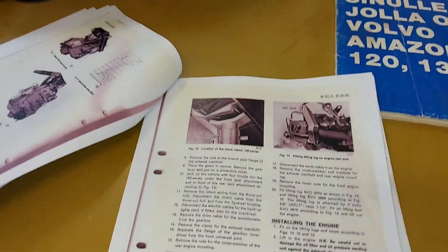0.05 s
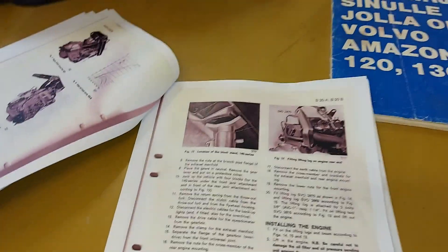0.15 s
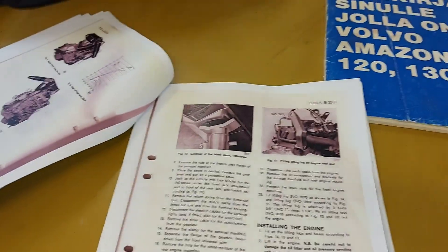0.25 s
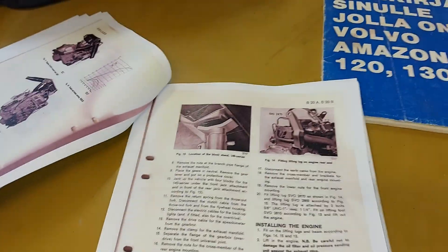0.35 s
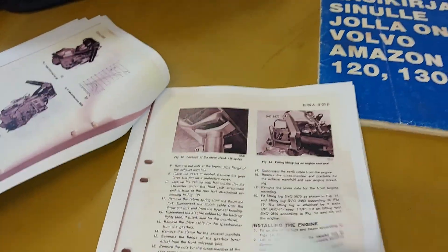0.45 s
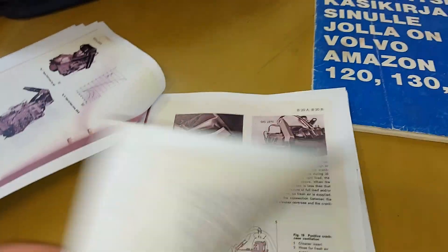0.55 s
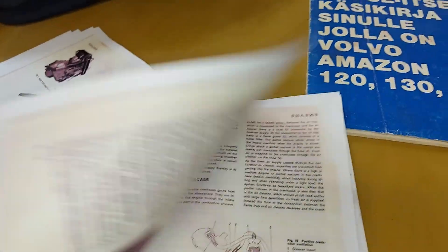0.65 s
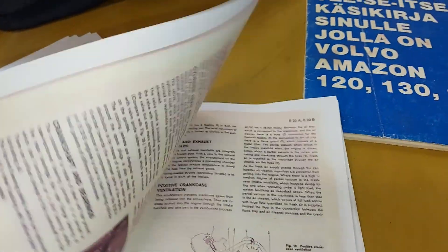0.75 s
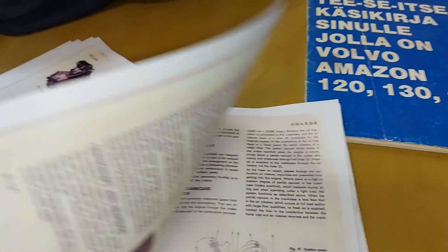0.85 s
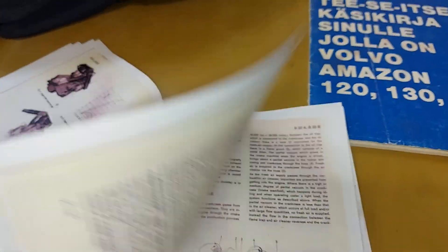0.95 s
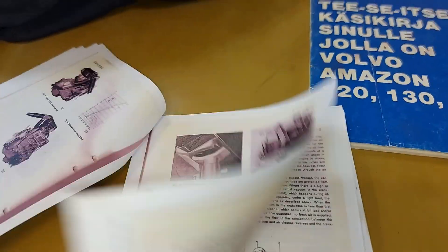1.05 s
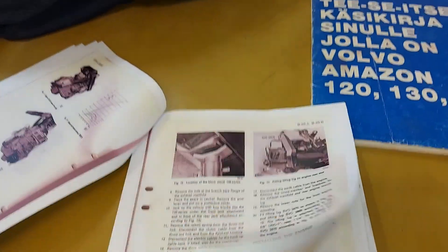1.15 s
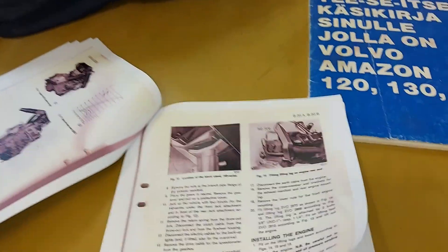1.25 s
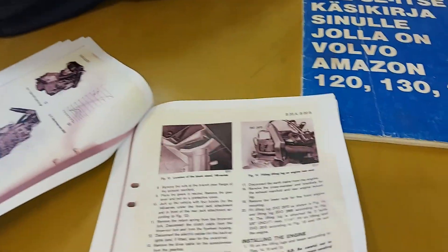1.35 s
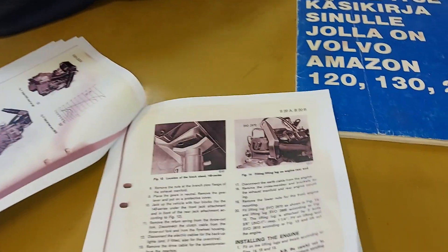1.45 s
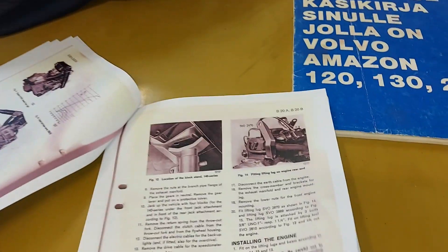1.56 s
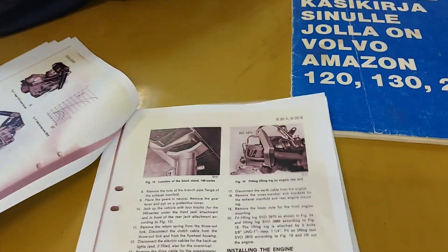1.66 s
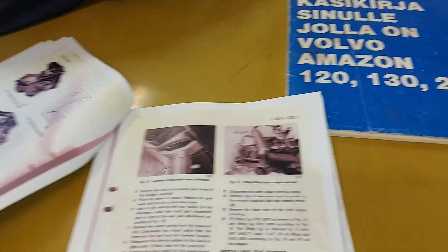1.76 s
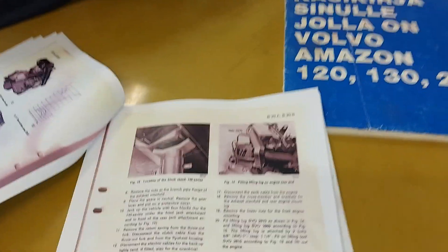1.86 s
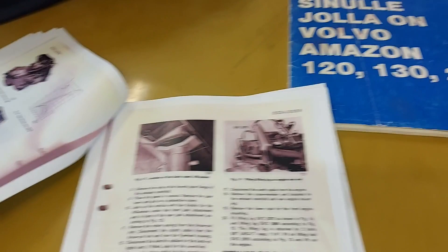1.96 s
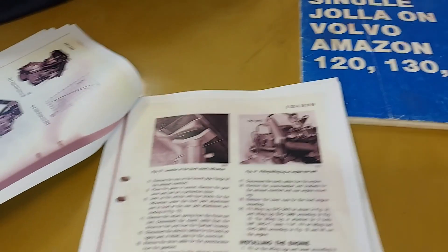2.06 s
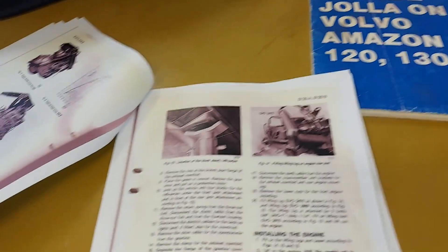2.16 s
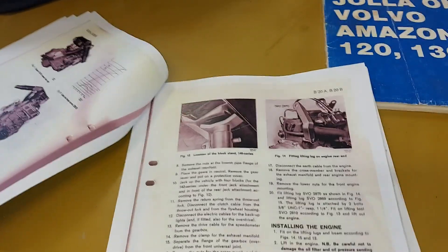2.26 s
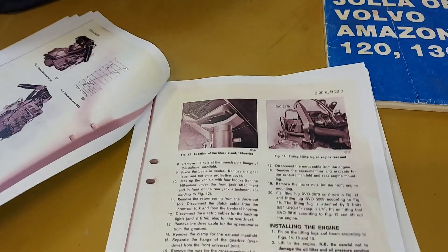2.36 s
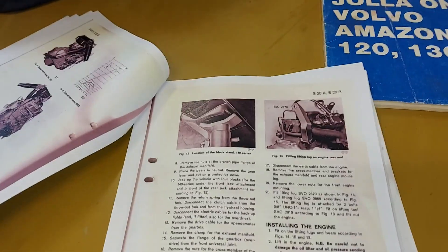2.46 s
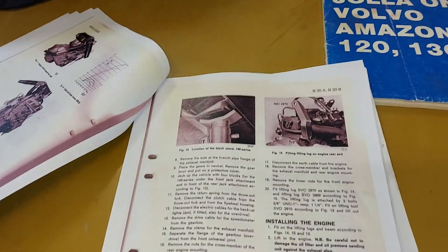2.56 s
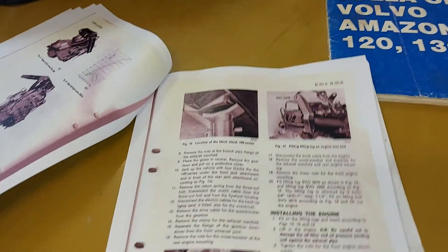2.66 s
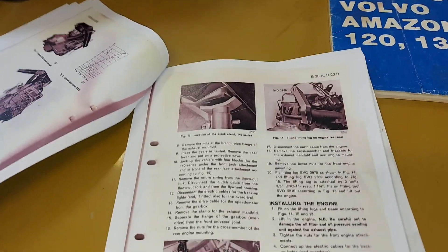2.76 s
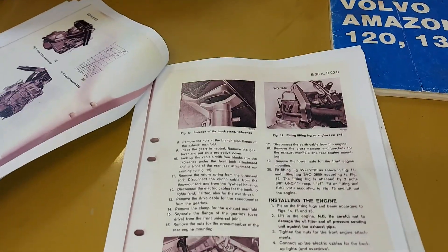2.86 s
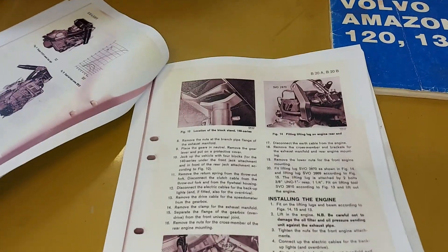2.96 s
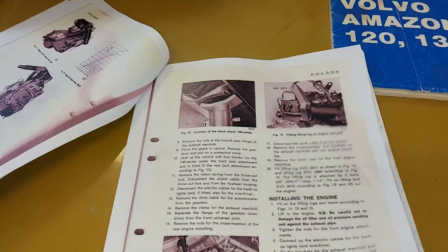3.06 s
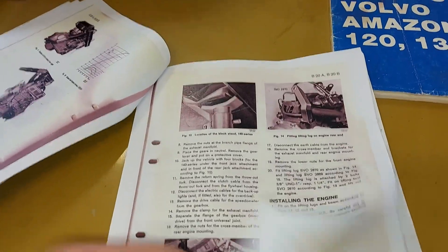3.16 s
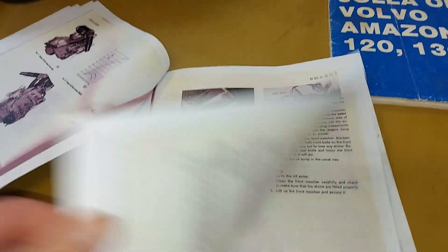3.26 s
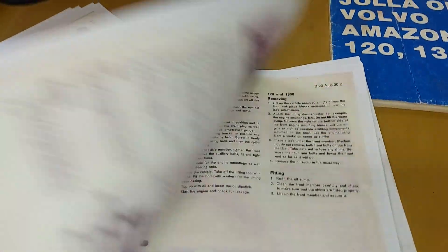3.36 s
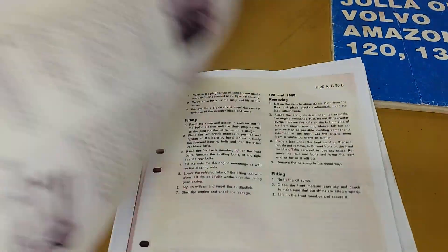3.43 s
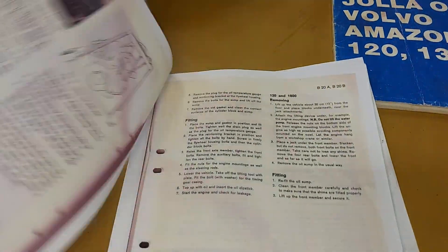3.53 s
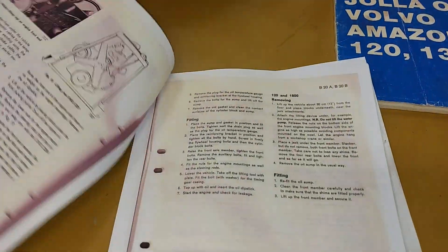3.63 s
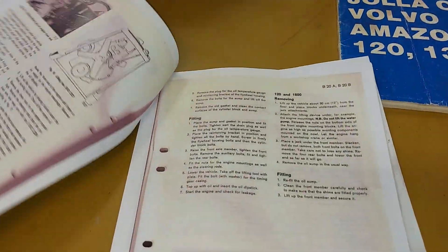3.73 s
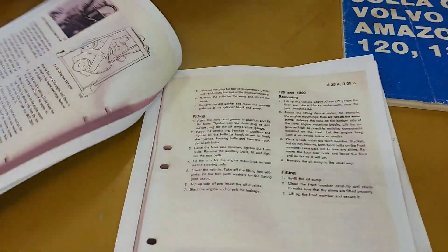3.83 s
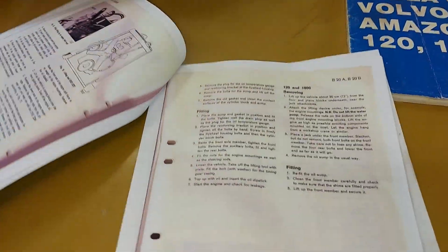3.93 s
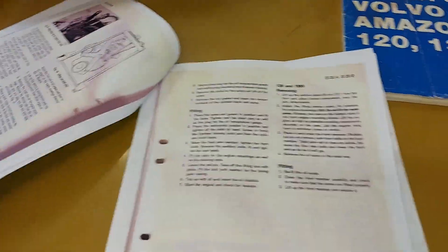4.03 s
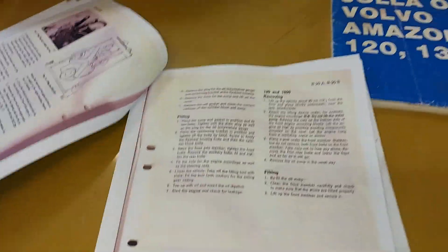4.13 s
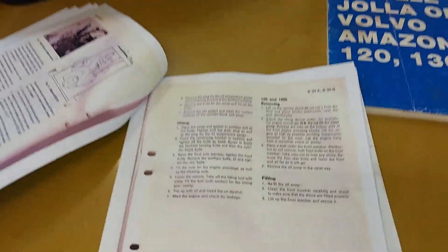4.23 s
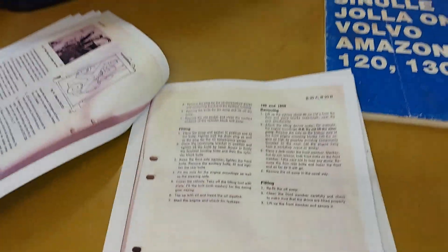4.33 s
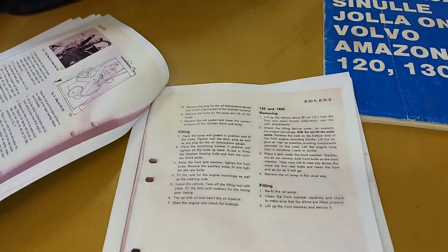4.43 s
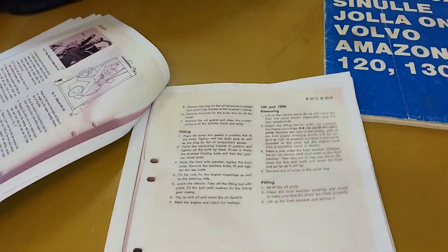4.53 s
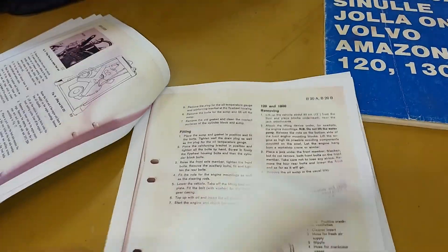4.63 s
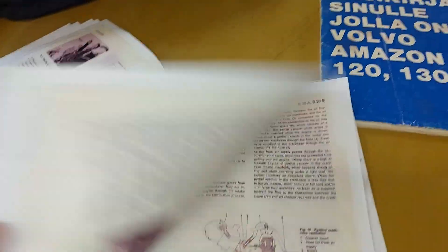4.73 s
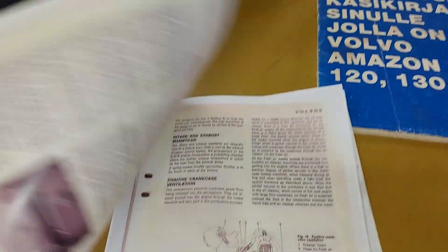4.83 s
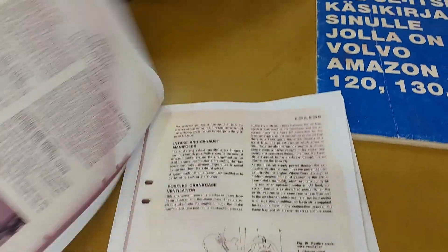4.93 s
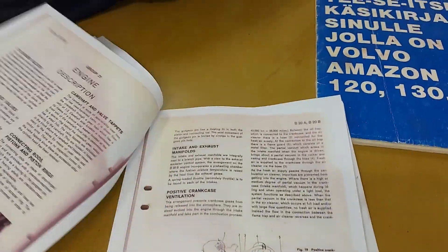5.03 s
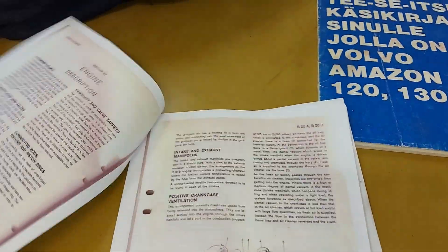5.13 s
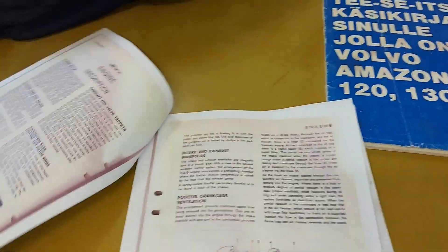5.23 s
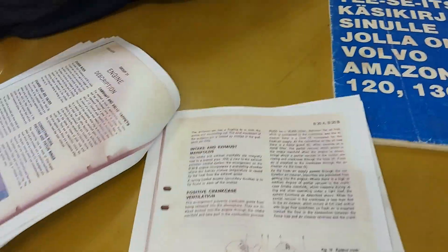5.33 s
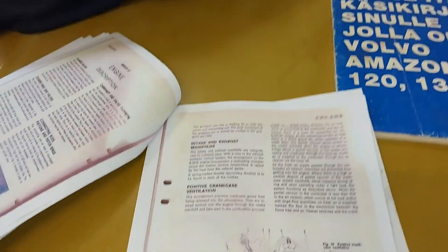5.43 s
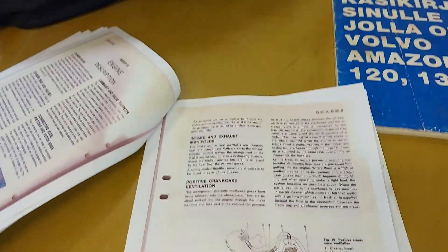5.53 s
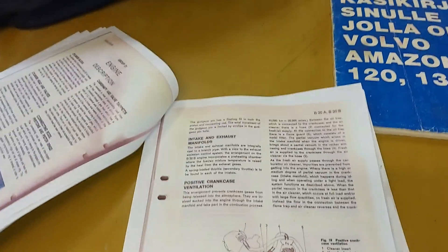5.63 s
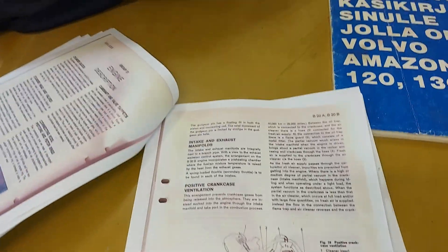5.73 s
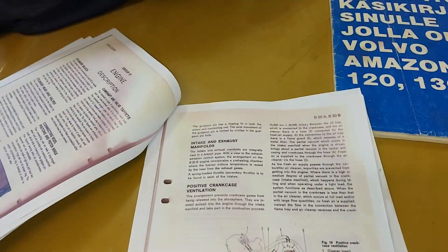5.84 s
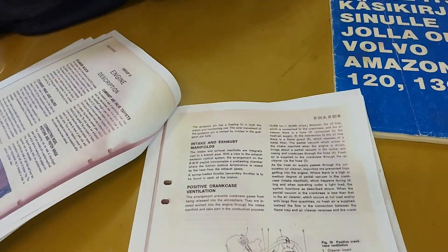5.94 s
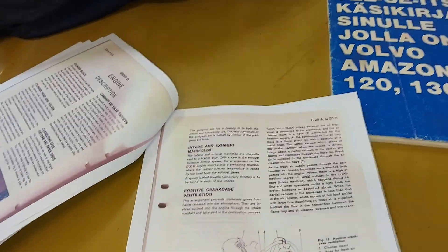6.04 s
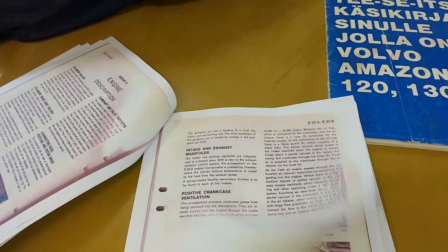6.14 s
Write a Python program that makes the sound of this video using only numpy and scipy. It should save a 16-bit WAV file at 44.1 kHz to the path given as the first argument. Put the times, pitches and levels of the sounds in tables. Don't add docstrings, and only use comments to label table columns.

```python
import sys
import numpy as np
from scipy import signal
from scipy.fft import rfft, irfft, next_fast_len
from scipy.io import wavfile
from scipy.ndimage import uniform_filter1d

SR = 44100
rng = np.random.default_rng(int(sys.argv[2]) if len(sys.argv) > 2 else 0)


def nominal_scale(level):
    x = np.asarray(level, float) / 20
    return 10 ** x


def log_audio(samples):
    frames = np.atleast_2d(samples).T
    limited = np.clip(frames, -1, 1)
    pcm = np.round(limited * 32767).astype(np.int16)
    wavfile.write(sys.argv[1], SR, pcm)


N = 272927
T = np.arange(N) / SR


def level(x, db):
    return x * nominal_scale(db) / np.sqrt(np.mean(x ** 2))


def peak(x, db):
    return x * nominal_scale(db) / np.max(np.abs(x))


def colour(x, points):
    hz, db = np.transpose(points)
    n = next_fast_len(len(x))
    log_hz = np.log(np.arange(n // 2 + 1) * SR / n + 1)
    gain = nominal_scale(np.interp(log_hz, np.log(hz), db, left=-90, right=-90))
    return irfft(rfft(x, n) * gain, n)[:len(x)]


def walk(rate):
    hold = int(SR / rate)
    steps = np.repeat(rng.standard_normal(N // hold + 1), hold)
    return 1.066 * uniform_filter1d(steps, hold)[:N]


def ring(x, hz, t60):
    radius = np.exp(-np.log(1000) / (t60 * SR))
    w = 2 * np.pi * hz / SR
    return signal.lfilter([np.sin(w)], [1, -2 * radius * np.cos(w), radius * radius], x)


def twice(x, hz, t60):
    return ring(ring(x, hz, t60), hz, t60)


def add(out, s, x):
    i = int(s * SR)
    out[i:i + len(x)] += x[:N - i]


def grain(spread_db):
    size_db = np.clip(spread_db * rng.exponential(size=N), 0, 12)
    return rng.standard_normal(N) * nominal_scale(size_db)


# time in seconds, then levels in dB of sheet scrape, sheet body,
# edge hiss and air puff.
SLIDE = [(0.0, -66.5, -62, -74, -68), (0.112, -66.5, -61.5, -86, -64), (0.153, -44, -61.5, -55.5, -71.0),
         (0.192, -40.5, -47.0, -53, -67), (0.208, -57, -67, -65.0, -59), (0.216, -43.5, -52, -55, -67),
         (0.244, -44.5, -52.5, -55, -68.5), (0.255, -41.5, -49.5, -51, -68.5),
         (0.311, -33.5, -42, -44, -66), (0.333, -48.0, -55.0, -56.5, -67.0),
         (0.477, -46.5, -52.5, -51, -70), (0.549, -60.5, -62.5, -74.5, -69),
         (0.566, -50.0, -49, -55.5, -60), (0.608, -50, -44, -51, -49), (0.685, -60.5, -54, -65, -61),
         (0.832, -55.5, -49.5, -63.5, -58), (0.838, -39, -34, -54, -50), (0.886, -45.5, -42, -61, -39),
         (0.926, -62, -55, -72.0, -50), (1.022, -62.5, -57, -63.5, -50), (1.125, -66, -65, -87, -56),
         (1.157, -62, -52, -66, -54), (1.366, -61, -64, -71, -55), (1.38, -48, -51, -56.5, -47),
         (1.469, -51.5, -55, -60, -63), (1.511, -46.0, -55, -54.5, -62), (1.574, -60, -58, -69, -62),
         (1.605, -47.5, -53, -53.5, -74), (1.68, -55.5, -60.5, -60.5, -72), (1.709, -63.5, -64, -73, -70),
         (1.9, -76, -66, -72, -71), (2.05, -87, -75, -83, -73.5), (2.139, -96, -77.5, -92.5, -72),
         (2.291, -90, -83, -95, -75), (2.312, -86, -74, -89, -71), (2.318, -78, -77, -79, -65),
         (2.331, -80.5, -71, -75, -59), (2.474, -72, -75.0, -77.5, -76), (2.562, -79, -60, -76, -57),
         (2.585, -65.5, -49, -74, -45), (2.706, -77, -69, -80, -60), (2.754, -60, -58, -63.5, -74),
         (2.872, -58.5, -63.5, -74, -72), (2.967, -75.5, -72, -89, -78), (2.993, -45, -54.5, -53, -73.0),
         (3.017, -29, -46, -41.5, -69), (3.088, -54.5, -64.0, -58.5, -80), (3.137, -54, -50, -54, -55),
         (3.265, -59.5, -62.5, -74, -63), (3.281, -53.5, -50.0, -66, -65), (3.44, -65.5, -59, -82, -64),
         (3.486, -46, -35.5, -69, -45), (3.528, -61, -47.5, -84, -48), (3.608, -56, -45, -74.0, -48.5),
         (3.648, -55.5, -45.5, -64.5, -46.5), (3.72, -78, -56, -86.0, -63), (3.799, -88, -58, -89, -65),
         (3.824, -87, -59, -90, -71), (3.834, -68, -60, -76.5, -77.5), (3.88, -62.5, -67, -68, -74),
         (4.023, -84, -83, -79.5, -80), (4.047, -70, -66.5, -72.5, -65), (4.262, -70, -72.5, -68.5, -83),
         (4.375, -51, -62, -66.0, -75.0), (4.39, -35.5, -59, -52.0, -68), (4.454, -38, -52, -52, -76),
         (4.464, -53, -61, -61, -74), (4.486, -65, -68.0, -65, -75), (4.51, -37.5, -48.5, -50.5, -67.0),
         (4.55, -52, -55, -57.5, -67), (4.572, -46.5, -50.5, -47.5, -67), (4.669, -53.5, -58, -65, -75.0),
         (4.773, -54, -54.5, -58, -64), (4.831, -44.5, -49, -46, -58), (4.861, -59, -47, -57, -48),
         (4.965, -62.5, -56, -71.5, -58.5), (5.021, -52.5, -52.5, -66.0, -68),
         (5.053, -67, -45.5, -76.0, -48), (5.076, -53, -38.5, -86, -54), (5.171, -75, -59, -91.0, -75.5),
         (5.196, -68.5, -49, -90, -69), (5.26, -86, -58, -95, -70), (5.268, -66, -63.0, -66, -71.0),
         (5.315, -60.0, -64.5, -64.5, -77.0), (5.42, -70.5, -72.5, -72, -76),
         (5.547, -89.5, -81, -87.5, -77.0), (5.748, -80.5, -85, -83.0, -80),
         (5.789, -52.5, -70, -57, -77.0), (5.875, -70, -70, -69.5, -81), (5.915, -60, -65, -75, -76.0),
         (5.93, -32, -54.5, -44.5, -76.0), (5.97, -34, -47, -45.5, -72), (6.018, -41.5, -49, -53.5, -74.0),
         (6.066, -42, -49.5, -46, -72), (6.188, -59.5, -63, -69.5, -75)]
# resonance in Hz, level in dB, t60 in seconds.
CURL = [(900, 0, 0.0094), (1600, 0, 0.0035), (2480, -1.5, 0.0065), (3087, 1.5, 0.0042), (3740, -1.5, .005),
        (4370, 4.5, 0.0028)]
# frequency in Hz, level in dB per Hz.
SCRAPE = [(710, -36), (1200, -9.5), (1470, -17.5), (1720, -4), (1950, 0), (2350, 0), (3560, 2.5),
          (5000, -3.5), (6500, -23), (8450, -49), (14300, -120)]
BODY = [(180, -44), (300, -18), (673, 3), (741, 1), (976, 3.5), (1370, 0.5), (1590, 0), (2500, -14.5),
        (3250, -33), (5500, -120)]
EDGE = [(3000, -31), (4000, -7), (4600, -2), (5600, -2), (6500, -11.5), (7500, -34)]
FIZZ = [(5000, -28.5), (6200, -2.5), (7000, 0.5), (9000, -5), (11400, -17), (15800, -21.5)]
PUFF = [(12, -51.5), (20, -22), (65, -3), (97, -5), (179, -2), (238, -2.5), (335, 0.5), (492, -6.5),
        (600, -9.5), (780, -28.5), (1320, -120)]


def slide():
    s, *columns = np.transpose(SLIDE)
    scrape_db, body_db, edge_db, puff_db = (np.interp(T, s, c) for c in columns)
    slips = grain(spread_db=2.5)
    judder = walk(45) * 1.95 + walk(180) * 1.8

    pockets = np.zeros(N)
    for hz, db, t60 in CURL:
        opening = nominal_scale(5.23 * walk(16))
        pockets += level(ring(slips, hz, t60), db) * opening
    sheet = level(slips, 0) + level(pockets, -2.1)

    scrape = colour(sheet, SCRAPE) * nominal_scale(judder + 0.42 * walk(30))
    body = colour(sheet, BODY) * nominal_scale(0.52 * judder + 0.67 * walk(30))
    edge = colour(slips, EDGE) * nominal_scale(judder + 1.4 * walk(30))
    fizz = colour(slips, FIZZ) * nominal_scale(judder + 1.8 * walk(20))
    puff = colour(rng.standard_normal(N), PUFF) * nominal_scale(0.94 * walk(25))

    fizz_db = edge_db + 0.25 * (edge_db + 53)
    out = level(scrape, -0.78) * nominal_scale(scrape_db)
    out += level(body, -1.63) * nominal_scale(body_db)
    out += level(edge, -1.64) * nominal_scale(edge_db)
    out += level(fizz, -6.5) * nominal_scale(fizz_db)
    return out + level(puff, -2.66) * nominal_scale(puff_db)


# start in seconds, length in seconds, sheet ring level in dB, sheet
# ring in Hz, crack level in dB, thump level in dB.
SNAPS = [(0.086, 0.019, -50.5, 1190, -46.5, -56), (0.343, 0.0061, -41.5, 694, -41.5, -72),
         (0.36, 0.014, -41.0, 1020, -47, -50), (0.4097, 0.013, -43.5, 2500, -31, -78),
         (0.7376, 0.0072, -34, 786, -44.5, -55), (0.945, 0.012, -32.5, 1770, -32.5, -29.5),
         (0.971, 0.016, -29.5, 2060.0, -37, -29), (1.0025, 0.01, -26.5, 1600.0, -29, -24.5),
         (1.044, 0.0097, -32, 1600.0, -33, -25), (1.1356, 0.013, -28, 770, -33.5, -31.5),
         (1.169, 0.0136, -34, 680, -32.5, -25), (1.2525, 0.0068, -35, 800, -41.5, -43),
         (1.2748, 0.013, -40, 2070, -41, -33), (1.29, 0.0049, -38.5, 890.0, -34, -45),
         (1.3104, 0.015, -39, 1400, -32, -33.5), (2.311, 0.017, -55, 620.0, -64, -48.5),
         (2.542, 0.017, -42, 610, -54, -46.0), (2.577, 0.005, -34.5, 1620, -45, -45),
         (2.7324, 0.0017, -51, 900, -41, -64), (2.772, 0.0016, -39, 1920, -48, -63),
         (2.7808, 0.0025, -50, 1900, -36.5, -46), (2.8518, 0.0034, -36, 1110, -38, -49),
         (3.1063, 0.0073, -31.5, 2240.0, -24.5, -48.5), (3.171, 0.0024, -50, 1980, -36, -59),
         (3.272, 0.0039, -18, 860, -27, -41), (3.3032, 0.013, -30.5, 870, -33.5, -36),
         (3.4626, 0.0036, -20.5, 1050, -26, -36), (3.4705, 0.0047, -19, 830, -63, -32),
         (3.536, 0.014, -32.5, 820, -71, -36), (3.5717, 0.0081, -25, 1020, -68, -46),
         (3.7277, 0.012, -44.5, 1590, -80, -63), (4.0373, 0.0014, -61, 840.0, -46.5, -49.5),
         (4.1455, 0.022, -54, 1640.0, -44, -59), (4.265, 0.0018, -65, 930, -37, -59),
         (4.276, 0.0038, -58, 2450, -35, -64), (4.3225, 0.0024, -56.5, 2500, -25, -68.0),
         (4.4887, 0.0039, -43.5, 714, -30.5, -52), (4.4915, 0.0081, -42, 2460, -23, -53),
         (4.56, 0.0031, -40, 2500.0, -20.5, -64), (4.592, 0.016, -38, 2390, -24.5, -54),
         (4.708, 0.0055, -37, 830, -49, -59), (4.7794, 0.0046, -26, 2640, -33.5, -41),
         (4.842, 0.0055, -38.0, 1000.0, -29, -31), (5.6438, 0.0052, -60.5, 1850, -62.5, -60),
         (5.8052, 0.0039, -65, 2540, -34, -75.0), (6.0679, 0.008, -43, 2480, -24.0, -67),
         (6.073, 0.005, -45, 2190, -22, -63)]
# frequency in Hz, level in dB,
# t60 in seconds.
CRACK = [(2934, 7.5, 0.0044), (4330, 9.5, 0.0037), (5840, -10.5, 0.0032)]
DESK = [(72, 6.5, 0.074), (204, 0, 0.023), (333, 2.5, 0.028)]


def snaps():
    out, t = np.zeros(N), T[:8192]
    push = np.sin(2 * np.pi * np.minimum(t / 0.0036, 1))
    desk = sum(nominal_scale(db) * ring(push, f, t60) for f, db, t60 in DESK)
    for s, length, ring_db, hz, crack_db, thump_db in SNAPS:
        length = np.clip(length, 0.001, 0.03)
        onset = np.minimum(t / (0.18 * length), 1)
        decay = np.exp(-(t / (0.77 * length)) ** 1.53)
        crackle = rng.standard_normal(len(t)) * onset * decay
        crackle[0] += 0.00007 / length ** 2

        sheet = peak(ring(crackle, hz, 9.3 / hz), 0) + peak(ring(crackle, 1980, 0.0027), -2.5)
        sheet = signal.lfilter(*signal.butter(N=2, Wn=3200, fs=SR), sheet)
        crack = sum(nominal_scale(db) * level(twice(crackle, f, t60 / 2), 0) for f, db, t60 in CRACK)
        add(out, s, peak(sheet, ring_db) + peak(crack, crack_db) + peak(desk, thump_db))
    return out


# start in seconds, peak level in dB, frequency in Hz.
TICKS = [(1.776, -60, 3010.0), (1.784, -54, 3400.0), (1.788, -60, 4540.0), (1.8145, -46, 6300),
         (1.8176, -45, 3400), (1.829, -46.5, 6100), (1.851, -52, 3850.0), (1.866, -57, 7800),
         (1.877, -39, 6520.0), (1.9058, -57, 4350.0), (1.9114, -57, 6590.0), (1.929, -51.5, 4500),
         (1.9622, -62, 6200.0), (1.9922, -49, 4500), (1.997, -48.5, 6330)]


def ticks():
    out, t = np.zeros(N), T[:1024]
    for s, db, hz in TICKS:
        kick = rng.standard_normal(len(t)) * np.exp(-t / 0.0012)
        spots = peak(twice(kick, hz, 0.0016), 0) + peak(twice(kick, 7550, 0.00065), -9)
        add(out, s, peak(spots, db))
    return out


def metal():
    start_s, hz, start_db, t60_s = 1.66, 565, -60.5, 2.7
    t = np.maximum(T - start_s, 0)
    phase = 2 * np.pi * np.cumsum(hz + 2.5 * walk(25)) / SR
    waver = nominal_scale(1.5 * walk(30))
    swell = np.minimum(t / 0.052, 1)
    return nominal_scale(start_db - 60 * t / t60_s) * np.sin(phase) * swell * waver


def echo(paper):
    t60_s, tail_db, dull_hz = 0.28, -22.5, 2980
    t = T[:SR // 2]
    tail = rng.standard_normal(len(t)) * nominal_scale(-60 * t / t60_s) * (t > 0.004)
    tail = signal.lfilter(*signal.butter(N=1, Wn=dull_hz, fs=SR), tail)
    tail *= nominal_scale(tail_db) / np.sqrt(np.sum(tail ** 2))
    return signal.fftconvolve(paper, tail)[:N]


# frequency in Hz, level in dB per Hz.
AIR = [(12, -31.5), (20, -13), (113, 5), (186, -13.5), (353, -9), (430, -23.5), (568, -5), (617, -4),
       (793, -9), (1110, -11), (1830, -28), (4000, -29), (15700, -29.5)]


def room_air():
    return level(colour(rng.standard_normal(N), AIR), -77.5)


# frequency in Hz, gain in dB.
MIC = [(10, -6), (9000, 0), (11500, 0), (11800, -10), (22000, -14)]


def scene():
    paper = colour(slide() + snaps() + ticks(), MIC)
    return np.tile(paper + echo(paper) + metal() + room_air(), (2, 1))


def low_pass(x):
    return signal.sosfilt(signal.butter(12, 15820, fs=SR, output="sos"), x)


def record(dry):
    grit_level = nominal_scale(-104) + nominal_scale(-42) * uniform_filter1d(np.abs(dry[0]), 512)
    grit = np.diff(rng.standard_normal(N + 1)) * grit_level
    mix = dry + grit * np.array([[1], [-1]])
    return low_pass(mix)


dry = scene()
out = record(dry)
log_audio(out)
```